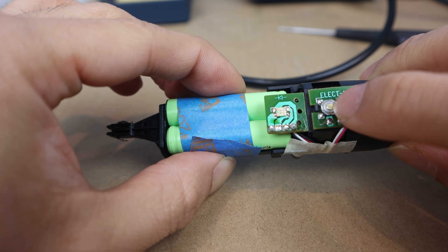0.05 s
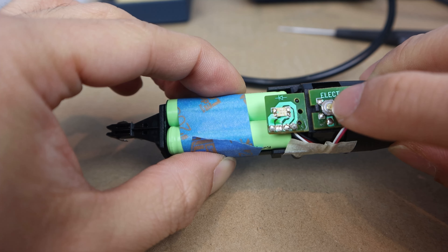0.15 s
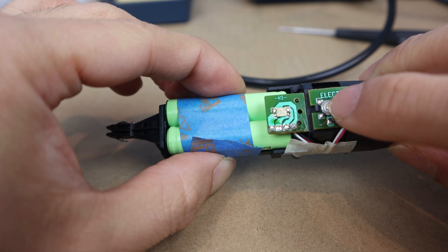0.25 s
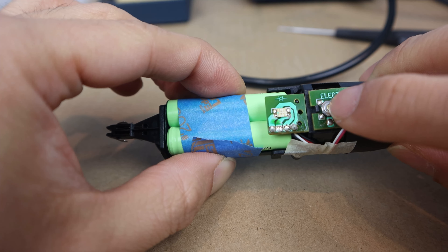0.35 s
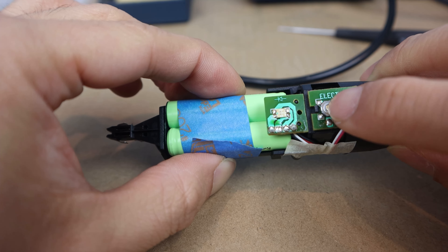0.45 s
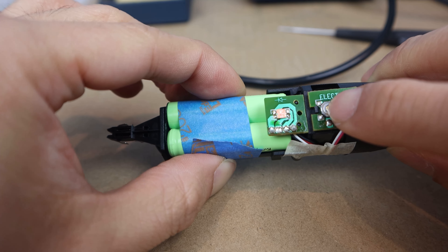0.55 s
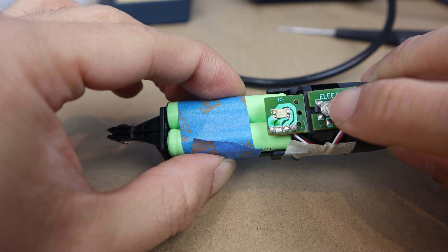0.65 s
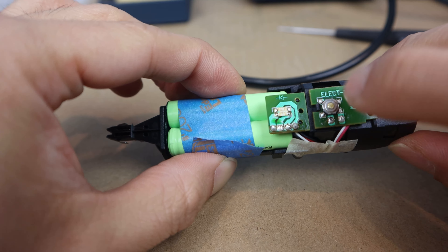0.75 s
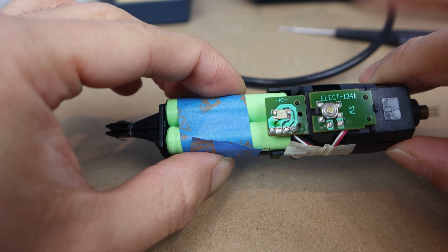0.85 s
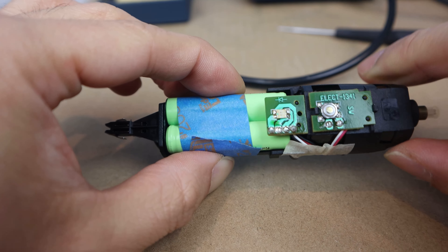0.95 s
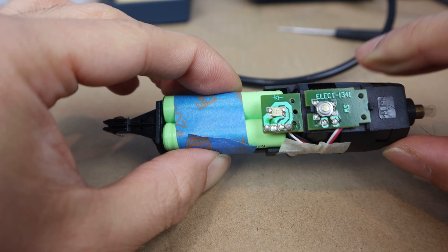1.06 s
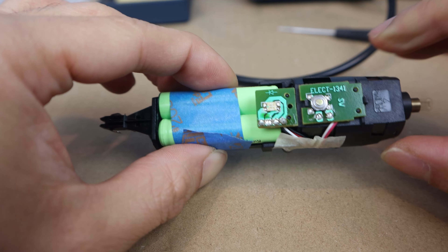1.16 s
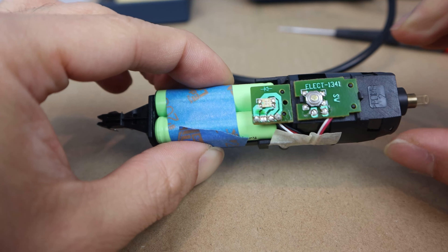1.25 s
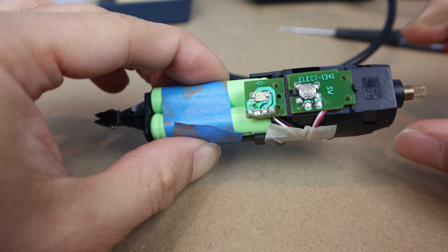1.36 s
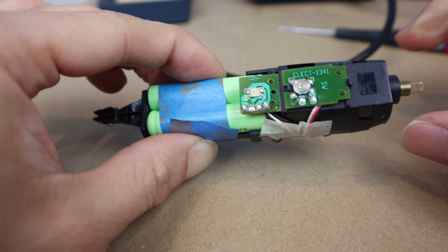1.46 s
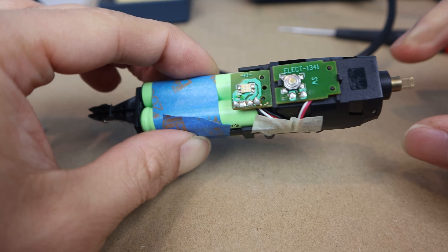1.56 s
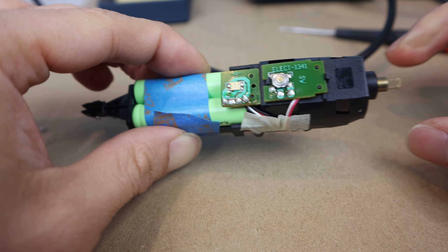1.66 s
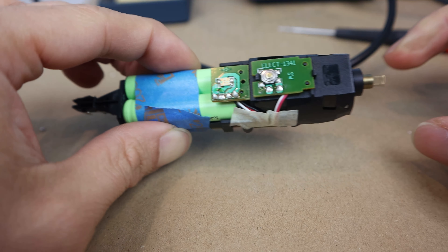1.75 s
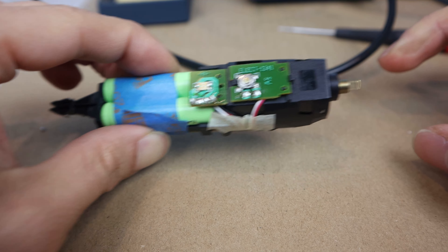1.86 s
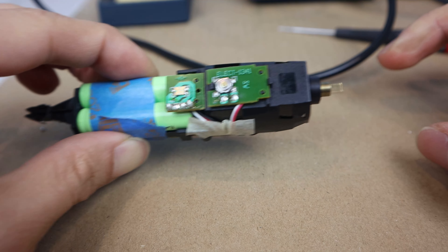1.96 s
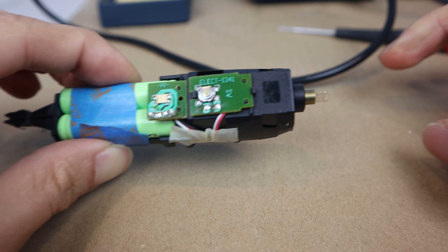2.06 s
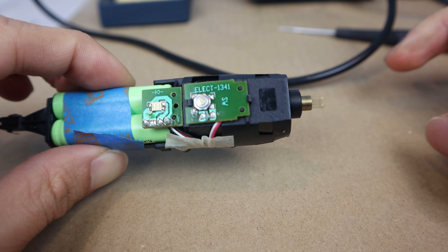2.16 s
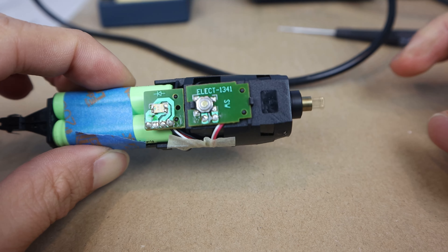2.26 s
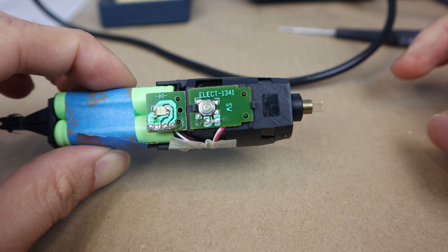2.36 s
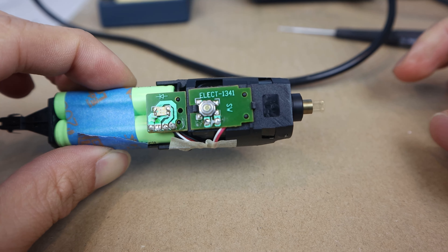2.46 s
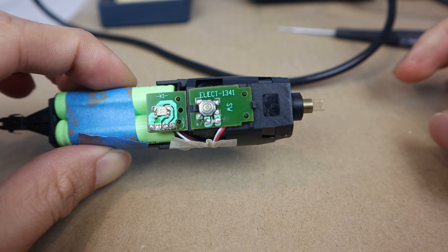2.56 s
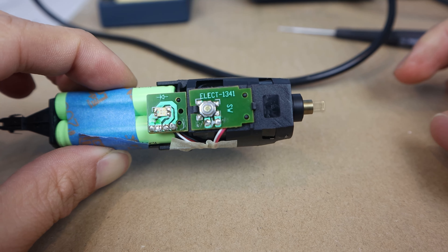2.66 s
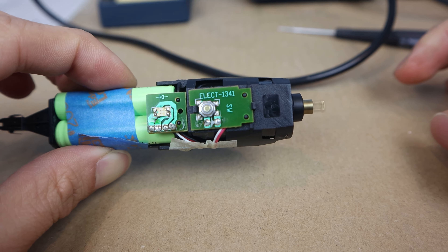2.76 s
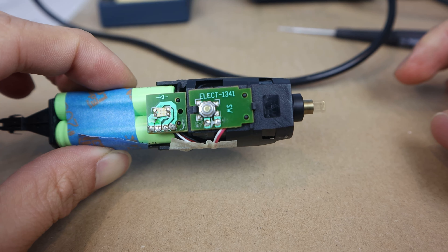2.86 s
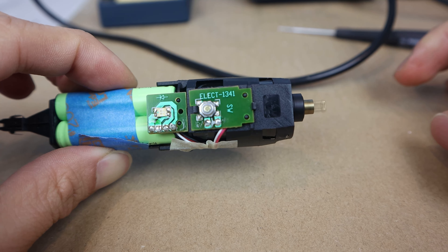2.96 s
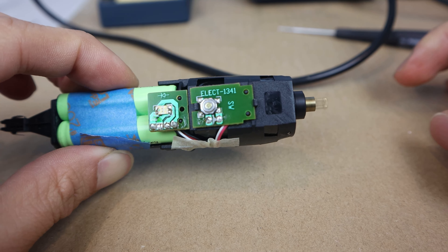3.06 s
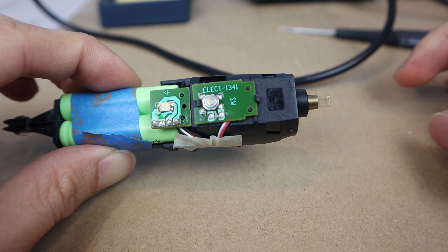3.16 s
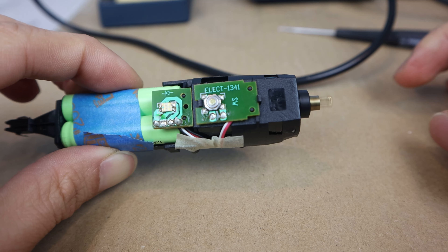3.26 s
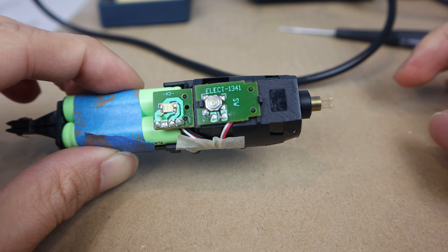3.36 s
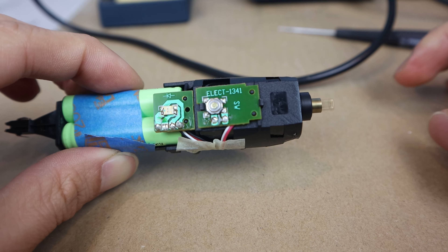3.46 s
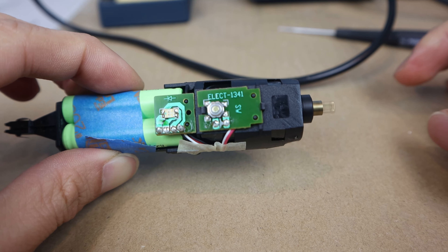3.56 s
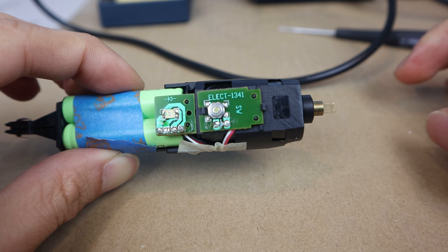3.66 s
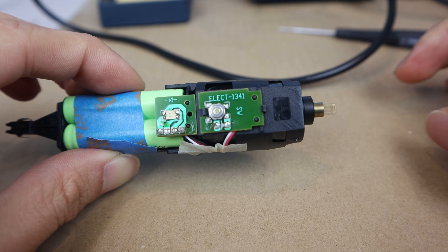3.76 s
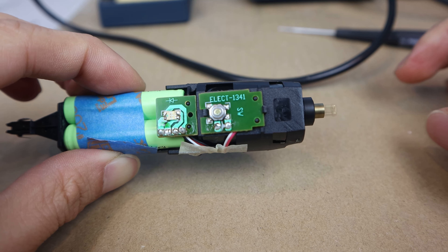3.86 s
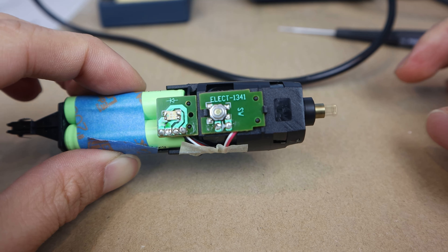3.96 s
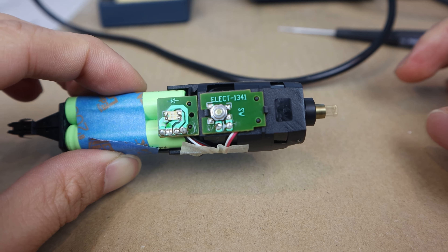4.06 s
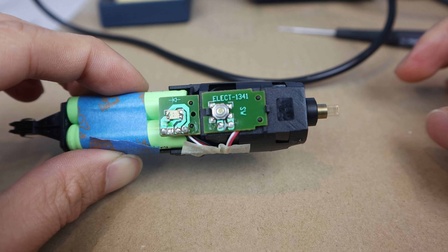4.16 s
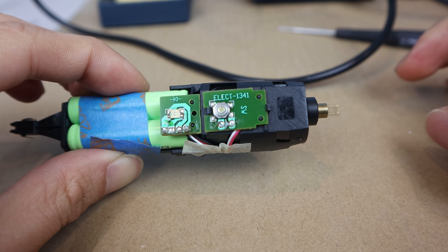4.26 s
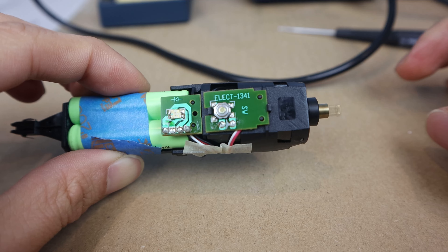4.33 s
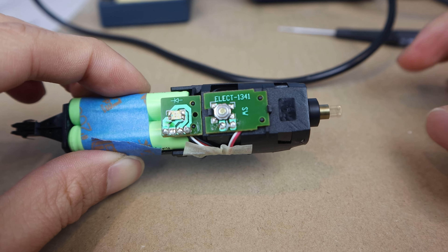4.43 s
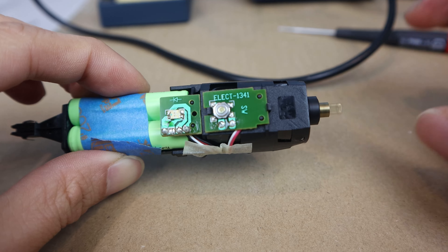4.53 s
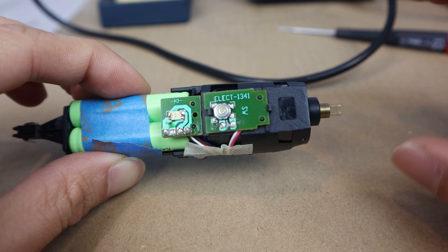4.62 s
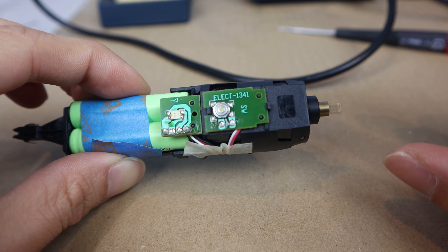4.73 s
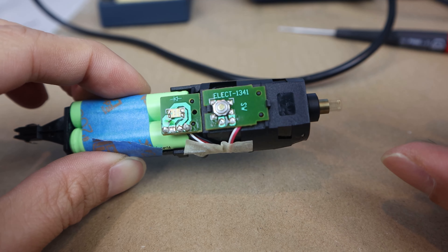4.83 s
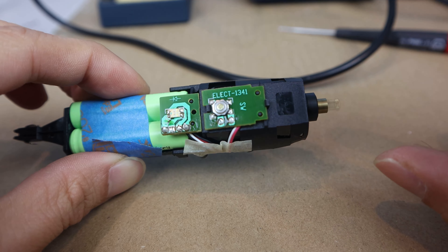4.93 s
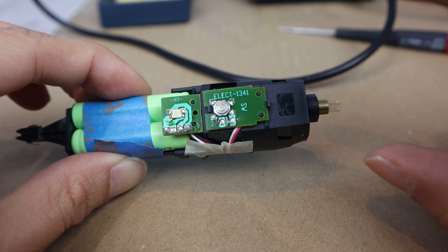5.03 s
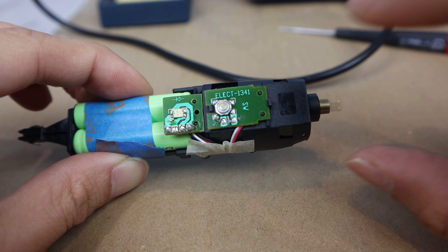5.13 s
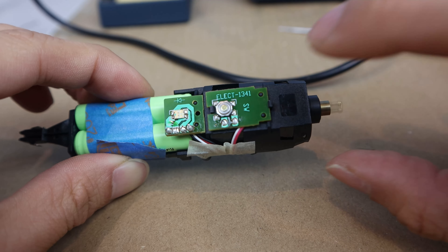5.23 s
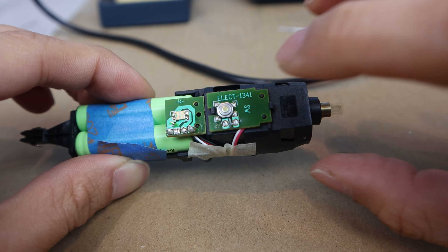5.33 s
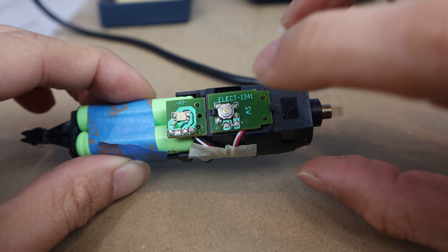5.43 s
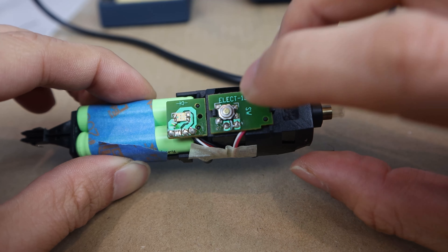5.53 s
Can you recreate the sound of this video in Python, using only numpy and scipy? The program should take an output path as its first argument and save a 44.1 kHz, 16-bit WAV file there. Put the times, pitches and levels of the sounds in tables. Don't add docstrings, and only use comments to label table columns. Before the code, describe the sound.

In a quiet humming, hissing room, fingers tick faintly on plastic, then a button clicks and a tiny brushed motor leaps up in pitch to a steady, raspy whine. The button snaps back brightly. The whine's colour shifts as hands change grip, one sharp wooden knock lands on the desk near the middle, and cloth brushes softly. Close stereo microphone; the motor is still running at the end.

```python
import sys
import numpy as np
from scipy import signal
from scipy.fft import irfft
from scipy.io import wavfile
from scipy.ndimage import uniform_filter1d, map_coordinates

SR = 44100
rng = np.random.default_rng(int(sys.argv[2]) if len(sys.argv) > 2 else 0)


def store_pcm(level_fs):
    pcm = np.round(np.clip(level_fs, -1, 1) * 32767).astype(np.int16)
    wavfile.write(sys.argv[1], SR, np.atleast_2d(pcm).T)


def magnitude_from_level(level_db):
    exponent = np.asarray(level_db, float) / 20
    return 10 ** exponent


N = 246463

# frequency in Hz, level in dB per Hz.
ROOM = [(12, -35), (20, -1), (65, -6.5), (197, -11.5), (305, -13.5), (460, -17), (640, -20), (2500, -27.5),
        (6000, -38.5), (9000, -44.5), (12700, -51), (13200, -75)]
ROOM_DB = -51.5
# frequency in Hz, side against mid in dB.
ROOM_SIDE = [(60, -34), (110, -12), (200, -5.5), (380, -0.5), (700, 3.5), (1290, 2.5), (2380, 4), (4400, 5),
             (8120, 3), (15000, 1)]
# frequency in Hz, level in dB.
HUM = [(59.2, -55), (118.4, -113), (242.2, -75.5), (360.7, -65)]

# start in seconds, peak in dB, pitch in Hz,
# time to ring down 60 dB in seconds, left against right in dB.
TICKS = [
    (.157, -47, 1800, .012, -1.),
    (.253, -44, 2700, .005, -1.),
    (.37, -48, 2100, .02, -1.),
    (.505, -45, 2050, .015, -1.),
    (.652, -36, 3000, .008, -2.5),
    (.658, -33, 3000, .008, -2.5),
    (.674, -32, 3100, .008, -2.5),
    (.678, -32, 3000, .008, -2.5),
]
RELEASE = [
    (.8116, -22, 3300, .006, -2.5),
    (.8118, -31, 1300, .02, -2.5),
    (.8152, -27, 4000, .008, -2.5),
    (.821, -30, 2400, .012, -2.5),
    (.83, -33, 3000, .012, -2.5),
]
THUMPS = [
    (4.9, -39, 190, 0.09, .1),
    (5.3, -47, 102, 0.17, .1),
    (2.8, -41, 217, 0.12, .1),
    (1.5, -40, 140, .15, .1),
    (3.1, -45, 58, 0.34, .1),
    (1.8, -37, 300, 0.14, .1),
    (4.8, -44, 160, 0.3, .1),
    (0.81, -51, 100, 0.18, .1),
]
# frequency in Hz, time to die by 60 dB in seconds.
TAIL = [(200, .4), (500, .38), (1000, .33), (3000, .25), (8000, .15)]

# time in seconds, turns per second in Hz.
SPEED = [(.85, 117.1), (1., 117.33), (1.15, 117.22), (1.4, 117.52), (2., 117.53), (2.8, 117.58),
         (3.6, 117.55), (4.5, 117.51), (5.2, 117.45), (5.6, 117.44)]
FULL_HZ = 117.52
ON_S, LAG_HZ, SPIN_UP_S = .652, 58, .033
START_DB, START_S = -6, 0.0076
# time in seconds, grip (0 pinched by both hands, 1 turned over,
# 2 held in one hand), whine level in dB, left against right in dB.
GRIP = [(.7, 0., -46, -2.5), (.8, -0.5, -46.5, -4), (1.1, 0.6, -46.5, -3.5), (1.25, 1.4, -47, -3.5),
        (1.45, 0.7, -46.5, -3), (1.95, 1.26, -45.5, -1.2), (2.2, 1.6, -46, -0.5), (2.45, 2.2, -46.5, -0.3),
        (3., 2.15, -45.5, -0.2), (5.1, 1.92, -45.5, -1), (5.35, 1.9, -44, -0.2), (5.6, 1.86, -44, -.5)]
GRIP_DB = [5.5, 2.5, 3.5]
# one order, pinched in dB, turned
# over in dB, one hand in dB.
CASING_ORDERS = [(-18, -15, -15), (-24, -16, -19), (-18, -13, -14), (-24, -20, -21), (-26, -21, -26),
                 (-4, -2, -1), (-2, 0, 0), (-5, -7, -11), (-6, -4, -3), (-9, -8, -15), (-9, -3, -2),
                 (-4, -3, -3), (0, -3, -7), (-8, -3, -2), (-10, -12, -11), (-7, -10, -17), (-16, -18, -14),
                 (-11, -11, -6), (-7, -4, -3), (-9, -6, -4), (-16, -4, -7), (-8, -2, -1), (-16, -7, -8),
                 (-14, -8, -9),
                 (-11, -5, -4), (-12, -5, -5), (-14, -7, -17), (-12, 0, -1), (-16, -7, -17), (-18, -5, -15),
               (-12, -3, -6), (-14, -5, -11), (-15, -3, -6), (-11, -11, -18), (-10, -9, -11),
               (-19, -15, -16), (-17, -8, -13), (-17, -6, -10), (-20, -15, -17), (-20, -7, -6),
               (-16, -3, -12), (-27, -14, -5), (-28, -16, -14), (-12, -1, -7), (-21, -8, -4),
               (-23, -10, -15), (-11, -4, -16), (-21, -21, -16)]
TOP_ORDER = 124
# frequency in Hz, level in dB.
TREBLE = [(5700, -21.5), (6800, -20.5), (7500, -21), (8000, -27.5), (8700, -37), (11000, -25.5),
          (12300, -30), (14500, -39)]
TREBLE_DB = [1, 5, 3.5]
UNEVEN_DB = 3
NOTCH_HZ, NOTCH_OCTAVES = 9170, .12
NOTCH_DB = [-4, -10, -0.5]
# frequency in Hz, level in dB.
RADIATES = [(300, -28), (560, -15), (690, -5), (1000, 5)]
SNAP_TURNS = [0., -.043, .315, .66]
# level in dB, centre in Hz, width in octaves.
SNAPS = [
    (0., 2920, 1.64),
    (-4.5, 2190, 1.425),
    (-.5, 5520, 1.48),
    (-3., 1570, 1.64),
]
EDGE_TURNS = [-.015, .322, .659]
EDGE_DB = [0, -7, -7]
JITTER_TURNS = .00045
LOAD_DB, LOAD_S = 2, 0.026
PRESSED_ORDERS = [12, 13, 15, 16, 18, 19, 20, 22, 44, 47]
PRESSED_DB = [3, -6, 6, 4.5, -10, 3, -2, -1, -10, 0]
LET_GO_S = .8116
SLIPPED_ORDERS = [12, 19, 21, 22, 25, 29, 33, 34, 44, 47]
SLIPPED_DB = [4, -7, -12, 4.5, 1, -6, -7, 8.5, -7, -1]
SLIP_S, SLIP_HALF_S = 1.17, 0.2
# time in seconds, half length in seconds,
# change above 2 kHz in dB, change of the treble in dB.
FINGERS = [
    (0.66, .02, 11, -8),
    (.73, 0.076, -9, -9),
    (1.094, 0.12, -1.6, -3.5),
    (1.25, 0.39, 1.5, 1),
    (2.5, 0.23, 1.2, 1),
    (5.6, 0.46, -1.5, -4),
]
# frequency in Hz, share from 0 to 1.
FINGER_BAND = [(1700, 0), (3400, 1), (4700, 1), (5200, 0)]
MUFFLE_HZ, UNCOVERED_S = 12800, 1.41
# time in seconds, half length in seconds, level in dB.
SLAPS = [(.985, .012, -18.5), (1.012, 0.012, -11), (1.09, 0.014, -8), (1.694, .03, -20), (1.976, .04, -19),
         (2.11, 0.029, -10), (2.173, 0.03, -7), (2.237, 0.018, -26), (2.315, 0.011, -4),
         (2.387, 0.017, -12), (2.465, 0.017, -24), (3.295, 0.018, -8), (3.374, .02, -10),
         (3.458, 0.022, -10), (3.516, 0.017, -13), (3.9, 0.024, -23), (4.2, .03, -25), (4.5, 0.035, -26),
         (5.216, 0.019, -17)]
SLAP_HZ, SLAP_OCTAVES = 4300, 0.37
# frequency in Hz, side against mid in
# dB.
SIDEWAYS = [(60, -21), (200, -22), (740, -22), (1500, -12.5), (2500, -13.5), (4000, -4), (6000, -1),
            (7800, -1), (8600, 23), (9600, -9), (10300, 1), (15000, -4.5)]
# frequency in Hz, level in dB.
CHATTER = [(300, -20), (650, -6), (1500, 0), (2800, 1.5), (5000, 2), (6000, -3.5), (7600, -7), (8500, -23),
           (9700, -31), (10500, -7), (11500, -5.5), (13500, -20), (14300, -19), (14700, -70)]
CHATTER_DB, JOLT_HZ = -51.5, 5400
# time in seconds, half length in seconds, level in dB.
JOLTS = [
    (0.73, 0.061, -47),
    (.815, 0.024, -39.5),
    (1.043, 0.089, -42.5),
    (1.65, 0.29, -54),
    (1.996, 0.083, -43),
    (2.198, 0.18, -49),
    (4.498, 0.43, -57),
    (5.2, .12, -46.5),
]
# time in seconds, level in dB.
DRONE = [(5.2, -75), (5.35, -58), (5.5, -51.5), (5.6, -45)]

# frequency in Hz, level in dB.
CLOTH = [(150, -3), (400, -3), (900, -15), (1500, -4), (2500, -5.5), (3500, -7.5), (5000, -16), (8000, -54),
         (9000, -54)]
# time in seconds, half length in seconds, level in dB.
STROKES = [
    (1.94, 0.055, -47),
    (2.125, 0.066, -45),
    (2.358, 0.34, -48.5),
    (4.775, 0.033, -56),
    (5.42, 0.28, -45),
]
# start in seconds, peak in dB, left against right in dB.
KNOCK = (2.1356, -10.5, 5.1)
# frequency in Hz, level in dB, time to ring down 60 dB in seconds.
DESK = [(330, -9, .05), (500, -1.5, .11), (790, -2, .045), (1050, -5, .04), (1450, -4, .035),
        (2080, 1.5, .035), (2600, -4, .025)]
# delay in seconds, level in dB.
BOUNCES = [(.0022, -6), (.0039, -6), (.0062, -27), (.0098, -12), (0.0146, -6), (0.0224, -21), (0.0263, -13),
           (.041, -21), (.049, -11), (.056, -10.5), (.065, -19)]


def evened(x):
    return x / np.sqrt(np.mean(x ** 2) + 1e-20)


def read(points, hz):
    f, value = np.transpose(points)
    return np.interp(np.log(hz + 1), np.log(f + 1), value)


def curve(rows, t):
    s, *columns = np.transpose(rows)
    return [np.interp(t, s, c) for c in columns]


def spells(rows, t, order=2):
    return sum(height * np.exp(-abs((t - s) / half) ** order) for s, half, height in rows)


def drift(shape, size):
    smooth = uniform_filter1d(rng.standard_normal(shape), size, 0)
    return evened(uniform_filter1d(smooth, size, 0))


def noise(points, side, patchy_db, size=512):
    frames, hz = 4 * N // size + 5, np.fft.rfftfreq(size, 1 / SR)
    re, im = rng.standard_normal((2, frames, 2, len(hz)))
    patches = evened(uniform_filter1d(drift((frames, 1, len(hz)), size=6), 6, 2))
    z = (re + 1j * im) * magnitude_from_level(read(points, hz) + patchy_db * patches)
    z[:, 1] *= magnitude_from_level(read(side, hz))
    x = signal.istft(z.transpose(1, 2, 0), nperseg=size, noverlap=size * 3 // 4)[1][:, :N]
    return x / np.sqrt(np.mean(x[0] ** 2))


def stereo(mid, side):
    return np.array([mid + side, mid - side])


def add(mix, s, sound, pan_db):
    part = mix[:, round(s * SR):][:, :len(sound)]
    part += magnitude_from_level(np.array([[.5], [-.5]]) * pan_db) * sound[:part.shape[1]]


def room():
    t = np.arange(N) / SR
    hum = np.zeros(N)
    for hz, db in HUM:
        waver_db = 0.4 * drift(N, size=4000)
        hum += magnitude_from_level(db - 2.0 + waver_db) * np.sin(2 * np.pi * (hz * t + rng.random()))
    return magnitude_from_level(ROOM_DB - 1.5) * stereo(*noise(ROOM, ROOM_SIDE, patchy_db=2.0, size=2048)) + hum


def ticks_and_thumps():
    out, t = np.zeros((2, N)), np.arange(SR // 3) / SR
    for s, db, hz, t60, pan_db in TICKS + RELEASE + THUMPS:
        grain = uniform_filter1d(rng.standard_normal(len(t)), max(int(SR / hz / 6), 1))
        crack = grain * np.exp(-t * hz / 2.5)
        ring = magnitude_from_level(-60 * t / t60) * np.sin(2 * np.pi * hz * t)
        add(out, s, -magnitude_from_level(db) * (.7 * ring + .9 * crack), pan_db)
    return out


def echoes(x):
    train = np.zeros((2, SR // 2))
    starts = np.arange(160, SR // 2 - 20, 20)
    at = starts + rng.integers(0, 20, (2, (SR // 2 - 161) // 20))
    np.put_along_axis(train, at, rng.choice([-1., 1.], at.shape), 1)
    train[1] = .85 * train[0] + .53 * train[1]
    hz, t, z = signal.stft(train, SR, nperseg=256)
    tail = signal.istft(z * magnitude_from_level(-60 * t / read(TAIL, hz)[:, None]), SR, nperseg=256)[1]
    return signal.fftconvolve(x, tail / np.linalg.norm(tail[0]), axes=1)[:, :N]


def shaft(t):
    gap = LAG_HZ * np.exp(-np.maximum(t - ON_S, 0) / SPIN_UP_S)
    return (curve(SPEED, t)[0] - gap) * (t >= ON_S)


def low_orders(when, share, order):
    casing = share @ magnitude_from_level(np.array(CASING_ORDERS) + GRIP_DB).T
    poles = order[:casing.shape[1]] % 3 == 0
    load = np.exp(-((when - ON_S) / LOAD_S) ** 2)
    return casing * magnitude_from_level(LOAD_DB * load * (poles - 1.2))


def snap_edges(order):
    return magnitude_from_level(EDGE_DB) @ np.exp(-2j * np.pi * np.outer(EDGE_TURNS, order))


def treble_orders(when, share, order, hz):
    finger_db = spells([(s, half, db) for s, half, _, db in FINGERS], when)
    level_db = read(TREBLE, order * FULL_HZ) + (share @ TREBLE_DB)[:, None] + finger_db
    level_db = level_db + 1.04 * drift(hz.shape, size=50) + UNEVEN_DB * rng.standard_normal(len(order))
    dip = np.exp(-(np.log2(hz / NOTCH_HZ) / NOTCH_OCTAVES) ** 4)
    level_db = level_db + (share @ NOTCH_DB)[:, None] * dip
    jitter = np.exp(2j * np.pi * order * JITTER_TURNS * rng.standard_normal(when.shape))
    return abs(snap_edges(order)) * magnitude_from_level(level_db) * jitter


def hands_db(when, order, hz):
    thumb = sum(db * (order == k) for k, db in zip(PRESSED_ORDERS, PRESSED_DB)) * (when < LET_GO_S)
    bent = [(SLIP_S, SLIP_HALF_S, db * (order == k)) for k, db in zip(SLIPPED_ORDERS, SLIPPED_DB)]
    bright = spells([(s, half, db) for s, half, db, _ in FINGERS], when)
    return thumb + spells(bent, when, order=4) + bright * read(FINGER_BAND, hz)


def snap_phases(order, hz, low_count):
    snaps = 0
    for at, (db, centre, width) in zip(SNAP_TURNS, SNAPS):
        fall_db = np.minimum(12 * (np.log2(hz / centre) / width) ** 2, 6.)
        snaps = snaps + magnitude_from_level(db - fall_db) * np.exp(-2j * np.pi * order * at)
    snaps = np.where(order > low_count, snap_edges(order), snaps)
    return np.angle(snaps) + 0.54 * rng.standard_normal(len(order))


def brush_whine(turns, t):
    when = np.maximum(np.interp(np.arange(int(turns[-1]) + 2), turns, t), ON_S)[:, None]
    order = np.arange(TOP_ORDER) + 1
    hz = shaft(when) * order
    grip, level_db, pan_db = curve(GRIP, when)
    level_db = level_db + START_DB * np.exp(-(when - ON_S) / START_S)
    share = np.clip(1 - abs(grip - np.arange(3)), 0, 1)
    share = share / share.sum(axis=1, keepdims=True)
    low = low_orders(when, share, order)
    low_count = low.shape[1]
    high = treble_orders(when, share, order, hz)[:, low_count:]
    wander_db = read(RADIATES, hz) - read(RADIATES, order * FULL_HZ) + 0.47 * drift(hz.shape, size=20)
    size = np.hstack([low, high]) * magnitude_from_level(level_db + wander_db + hands_db(when, order, hz))
    slap = spells([(s, half, magnitude_from_level(db)) for s, half, db in SLAPS], when, order=4)
    slap = slap * magnitude_from_level(level_db - 14 * (np.log2(hz / SLAP_HZ) / SLAP_OCTAVES) ** 2)
    mid = size * np.exp(1j * snap_phases(order, hz, low_count)) + slap
    lean = magnitude_from_level(read(SIDEWAYS, hz) + 3.5 * rng.standard_normal(len(order)) - 1.5)
    lag = np.pi / 2 * rng.choice([-1, 1], len(order)) + 0.96 * rng.standard_normal(len(order))
    lag = lag + 0.27 * drift(hz.shape, size=60)
    side = mid * (lean * np.exp(1j * lag) + np.tanh(pan_db * np.log(10) / 40))
    steps = 2048
    place = [turns, turns % 1 * steps]
    whine = []
    for z in (mid, side):
        wave = irfft(np.pad(z, ((0, 0), (1, 0))), steps) * steps / 2
        whine.append(map_coordinates(np.pad(wave, ((0, 0), (0, 1)), "wrap"), place, order=1))
    return np.array(whine)


def brush_chatter(turns, t):
    gate = 1.2
    for at, (db, _, _) in zip(SNAP_TURNS, SNAPS):
        gate = gate + magnitude_from_level(db) * np.exp(-((turns - at + 0.013) % 1) / 0.15)
    chatter = noise(CHATTER, SIDEWAYS, patchy_db=0.5, size=256) * evened(gate)
    jolted = signal.sosfiltfilt(signal.butter(2, JOLT_HZ, fs=SR, output="sos"), chatter)
    return chatter * magnitude_from_level(CHATTER_DB) + jolted * spells([(s, half, magnitude_from_level(db)) for s, half, db in JOLTS], t)


def desk_drone(turns, t):
    return magnitude_from_level(curve(DRONE, t)[0]) * np.sin(2 * np.pi * turns) * np.array([[1], [0]])


def motor():
    t = np.arange(N) / SR
    turns = np.cumsum(shaft(t)) / SR
    sound = stereo(*(brush_whine(turns, t) + brush_chatter(turns, t) + desk_drone(turns, t)))
    sound = sound * np.clip((t - ON_S) / 0.0046, 0, 1)
    muffled = signal.sosfiltfilt(signal.butter(8, MUFFLE_HZ, fs=SR, output="sos"), sound)
    return np.where(t < UNCOVERED_S, muffled, sound)


def sleeve():
    t = np.arange(N) / SR
    flicker_db = 1.6 * drift(N, size=200)
    strokes = spells([(s, half, magnitude_from_level(db)) for s, half, db in STROKES], t)
    return stereo(*noise(CLOTH, SIDEWAYS, patchy_db=2.5)) * strokes * magnitude_from_level(flicker_db)


def desk_knock():
    out, t = np.zeros((2, N)), np.arange(SR // 3) / SR
    s, db, pan_db = KNOCK
    push = np.exp(-((t - .0004) / .00015) ** 2)
    rebound = .75 * np.exp(-((t - .0009) / .00021) ** 2)
    ring = sum(magnitude_from_level(d - 60 * t / t60) * np.sin(2 * np.pi * hz * t) for hz, d, t60 in DESK)
    knock = magnitude_from_level(db) * (.75 * (push - rebound) + .18 * ring)
    add(out, s - .0002, knock, pan_db)
    for delay, bounce_db in BOUNCES:
        bounce = magnitude_from_level(bounce_db) * uniform_filter1d(knock, 1 + int(delay * 500))
        add(out, s + delay, bounce, 1.7 * rng.standard_normal())
    return out


def scene():
    hits = ticks_and_thumps() + desk_knock()
    hits = signal.lfilter(*signal.butter(2, 6500, fs=SR), hits)
    return room() + hits + magnitude_from_level(-10.5) * echoes(hits) + motor() + sleeve()


def low_pass(x):
    return signal.sosfilt(signal.butter(12, 15660, fs=SR, output="sos"), x)


def record(dry):
    return low_pass(dry)


dry = scene()
out = record(dry)
store_pcm(out)
```